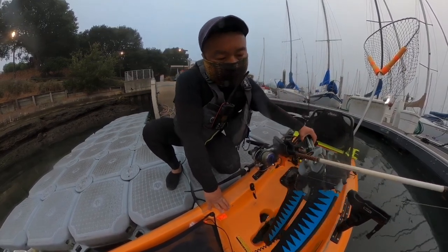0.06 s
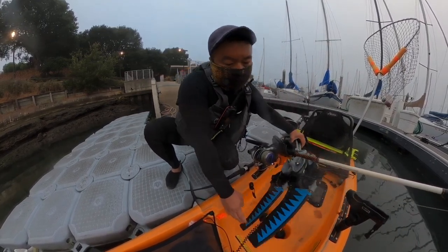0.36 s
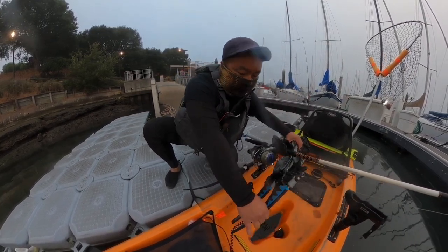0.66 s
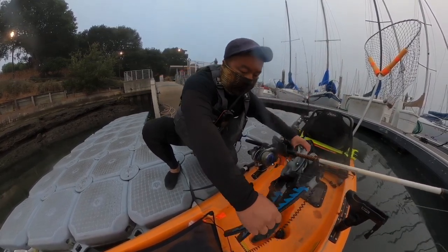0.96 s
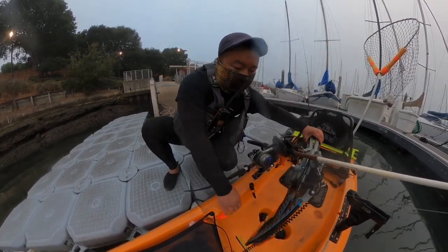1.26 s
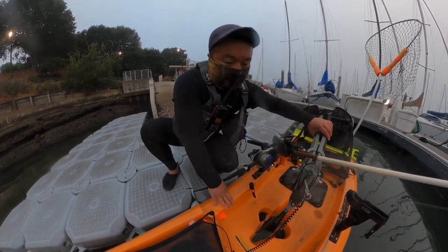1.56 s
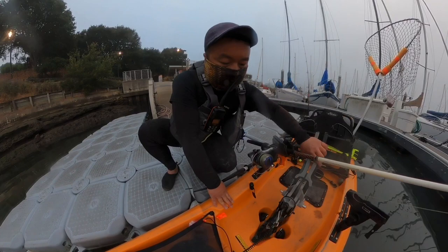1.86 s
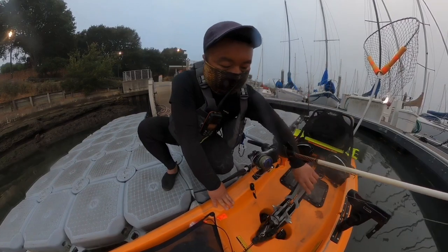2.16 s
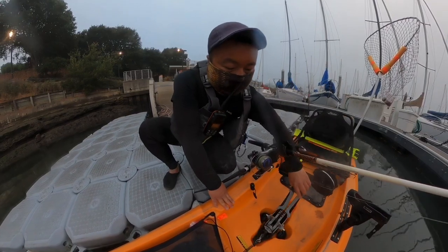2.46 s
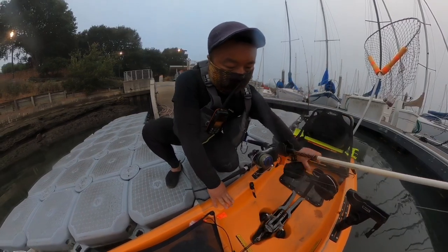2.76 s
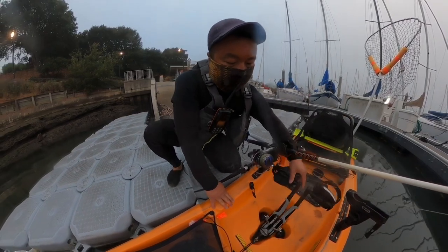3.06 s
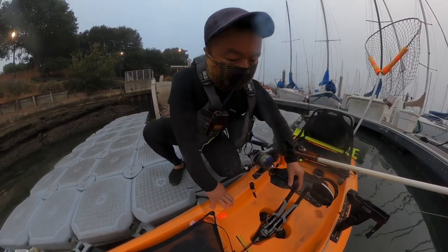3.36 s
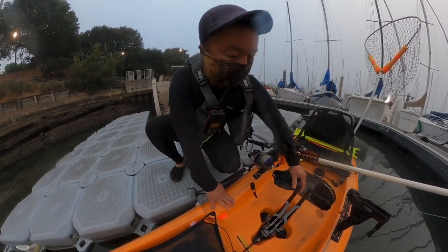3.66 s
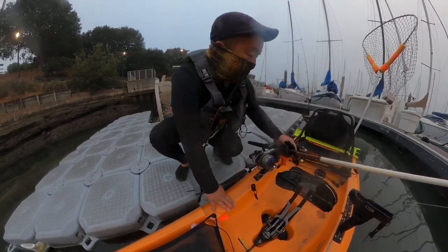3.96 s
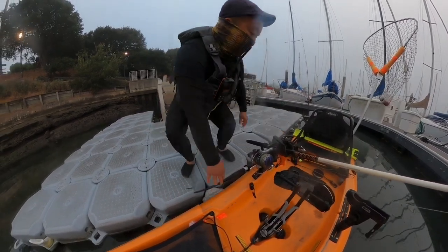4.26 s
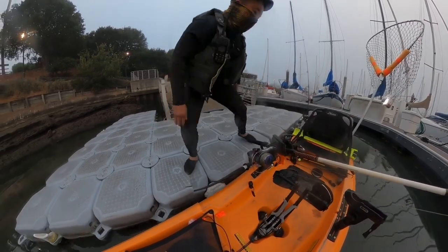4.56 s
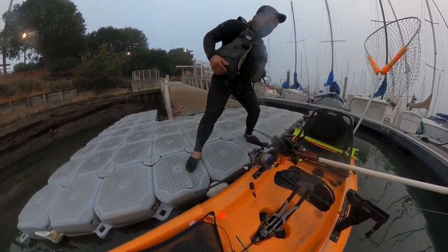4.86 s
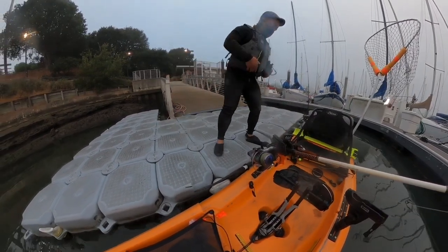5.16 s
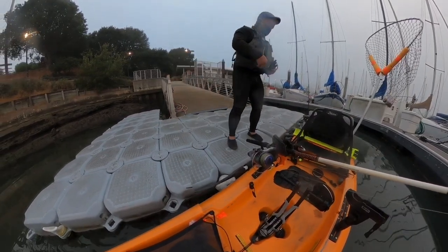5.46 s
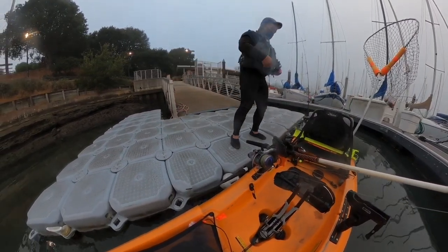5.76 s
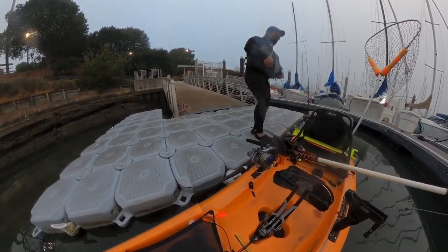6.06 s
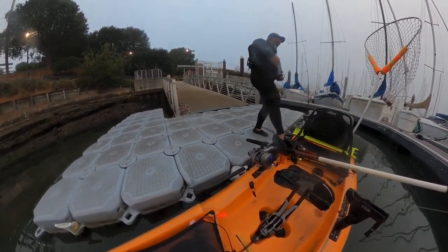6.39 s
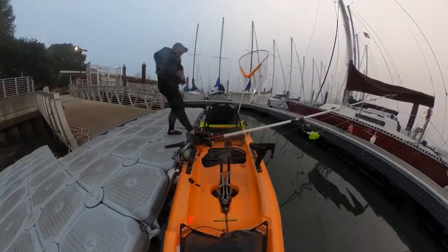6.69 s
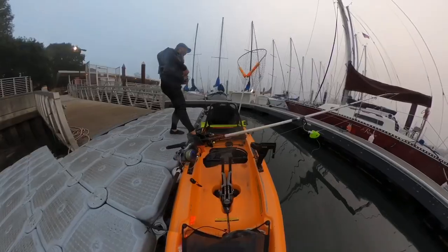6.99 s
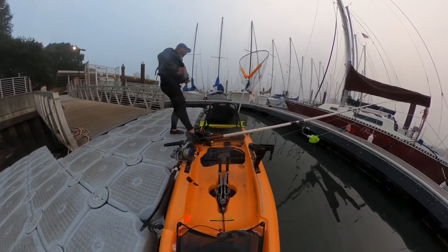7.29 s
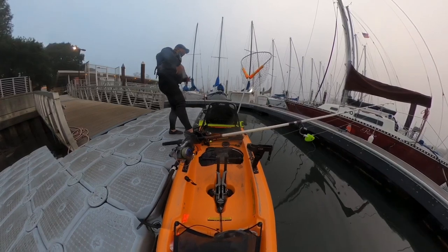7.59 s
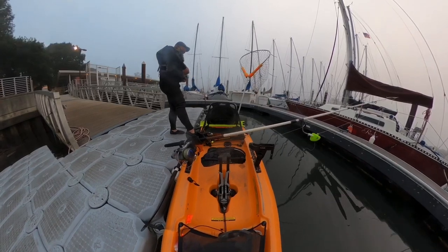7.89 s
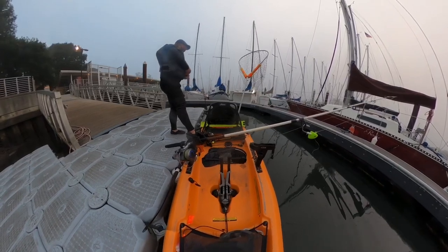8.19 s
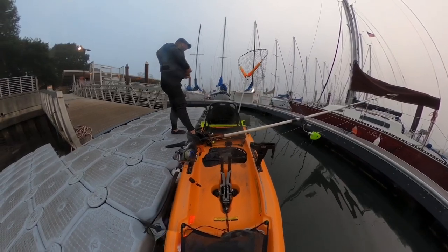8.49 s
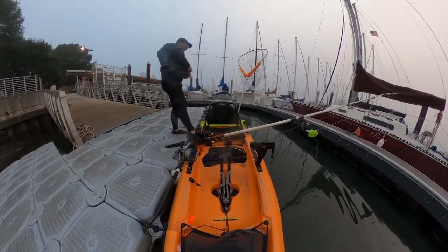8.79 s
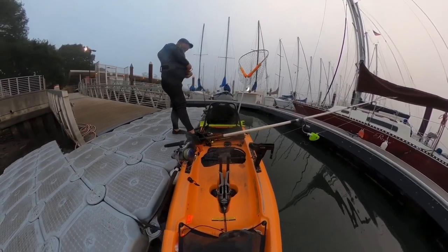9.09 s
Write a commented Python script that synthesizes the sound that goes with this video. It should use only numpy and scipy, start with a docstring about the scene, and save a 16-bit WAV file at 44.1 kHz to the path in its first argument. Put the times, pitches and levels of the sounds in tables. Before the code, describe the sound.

Faint water and rubbing open a close, dry outdoor scene beside a floating dock. After a soft bump at 0.5 seconds, a kayak's pedal drive clinks brightly from 0.8 to 1.4 seconds, mixed with plastic clacks, high catch ticks and hollow hull thumps. The mount creaks in short, fading bursts from 1.6 to 2 seconds. Clusters of hull thumps and rattling fittings follow between 2.1 and 3.1 seconds, then a firm double knock with a brief scrape near 3.5 seconds. Water sloshes lightly after the blows. After a lull, softer footsteps boom and scuff on hollow plastic floats from 4.4 to 6.5 seconds, with a few knocks. The rest is quiet, with one light knock near 7.1 seconds and faint low steps around 7.6 and 8.2. Gentle lapping, small plops, low hull rumble and faint clothing rustle continue until about 9 seconds.

```python
"""A quiet marina, beside a floating dock. A pedal drive is folded and seated in a hollow plastic kayak:
metal parts clink, a catch ticks, the mount creaks by stick-slip, fittings clack and the hull thumps,
each through its own decaying modes. The paddler then stands and steps over the booming, air-filled
floats. Soles, straps and clothes rub as grainy noise; water laps and rings with trapped bubbles."""
import sys
import numpy as np
from scipy import signal
from scipy.fft import rfft, irfft, next_fast_len
from scipy.io import wavfile
from scipy.ndimage import uniform_filter1d

SR = 44100
rng = np.random.default_rng(int(sys.argv[2]) if len(sys.argv) > 2 else 0)


def wav_out(sig):
    """Save sig, one row per channel (or a flat mono array), as 16-bit PCM at SR to the path in sys.argv[1]."""
    wavfile.write(sys.argv[1], SR, np.round(np.clip(np.atleast_2d(sig).T, -1, 1) * 32767).astype(np.int16))


N = 403074
HIT_TIME_S = np.arange(int(0.65 * SR)) / SR
TAP_TIME_S = np.arange(int(0.15 * SR)) / SR

# boat rocking: time_s, wash_db, rumble_db
ROCKING_CURVE = [(0.0, -61.5, -54.5), (0.33, -63.5, -52), (0.79, -65.5, -44.5), (0.99, -48, -43.5),
                 (1.2, -54, -43), (1.6, -48.5, -46.5), (2.09, -59, -52), (2.44, -43, -42),
                 (2.75, -57.5, -48), (3.36, -63.5, -52), (3.51, -40.5, -31), (3.84, -69.5, -59.5),
                 (4.35, -70, -63.5), (4.63, -58, -52.5), (5.01, -48.5, -45), (5.45, -65, -57),
                 (7.28, -59, -56), (8.4, -64, -51), (8.68, -69.5, -58), (9.14, -69.5, -57.5)]
# soles and straps rubbing: time_s, level_db
RUB_CURVE = [(0.0, -64), (0.89, -59.5), (1.02, -52), (1.3, -59), (1.78, -60), (2.09, -65.5), (2.31, -71.5),
             (2.47, -51), (2.67, -75), (3.56, -71), (3.69, -77), (4.63, -69), (5.01, -52.5), (5.65, -69.5),
             (7.54, -71), (7.86, -64.5), (8.15, -68.5), (9.14, -73.5)]
# clothes rustling: time_s, level_db
CLOTH_CURVE = [(0.0, -68), (0.38, -65), (0.84, -73.5), (1.02, -70), (1.52, -64), (1.81, -75.5), (2.49, -84),
               (2.67, -91), (3.21, -84.5), (3.89, -87), (4.35, -74), (4.86, -83.5), (5.11, -73), (5.7, -79),
               (7.03, -78), (7.89, -73.5), (8.09, -80.5), (9.14, -80)]
# hull rumble spectrum: freq_hz, density_db
RUMBLE_SPECTRUM = [(20, -15), (32, 4), (52, 4), (80, -1), (110, -4.5), (180, -5), (260, -15), (450, -35)]
# water wash spectrum: freq_hz, density_db
WASH_SPECTRUM = [(150, -28), (270, 5), (400, -2), (600, -11.5), (950, -16.5), (1600, -24)]
# sole and strap spectrum: freq_hz, density_db
RUB_SPECTRUM = [(650, -3.5), (900, -1), (1100, 5.5), (1400, 3.5), (2000, 0.5), (2700, -2.5), (3800, -5.5),
                (6000, -16)]
# cloth spectrum: freq_hz, density_db
CLOTH_SPECTRUM = [(2500, -6), (3600, -9), (4500, -8), (5600, -3), (7000, -5.5), (8400, -7), (9500, -16),
                  (11500, -24.5), (15000, -35)]
# sliding friction spectrum: freq_hz, density_db
SLIDE_SPECTRUM = [(200, -13), (480, 16.5), (600, 6), (870, 4), (1200, 2), (2200, -2), (3000, -3.5),
                  (4000, -8), (5300, -8), (8000, -14), (11000, -26.5), (15000, -31)]

# plops between hull and floats: start_s, level_db, pitch_hz
WATER_PLOPS = [(2.243, -47, 900), (2.639, -40, 870), (4.398, -49, 1100), (4.566, -48, 666),
               (4.75, -41, 797), (4.784, -43, 680), (5.299, -43, 1370), (5.397, -38.5, 1136),
               (5.415, -41, 1090), (5.883, -42, 753), (5.973, -39.5, 1330), (6.312, -47.5, 767),
               (6.378, -49.5, 1320), (7.185, -43.5, 1005), (7.696, -46.5, 1710), (8.08, -44.5, 790),
               (8.43, -40, 1060), (8.665, -50.5, 2000), (8.999, -46.5, 1710)]
# steps on the floats: start_s, level_db, pitch_hz, t60_s
DOCK_STEPS = [(4.458, -37, 53.7, 0.71), (4.612, -30, 61, 0.084), (5.905, -36.5, 61.1, 0.94),
              (6.438, -43, 44, 0.79), (7.593, -39, 44.4, 0.15), (8.233, -46, 56.1, 0.46)]
# short slides of gear and soles: peak_s, level_db, fall_s, centre_hz
SLIDES = [(0.12, -64, 0.22, 14100), (0.47, -59, 0.25, 2660), (1.15, -46.5, 0.056, 1900),
          (2.312, -48.5, 0.02, 2820), (2.409, -48, 0.061, 2000), (2.551, -46, 0.015, 1500),
          (3.044, -49.5, 0.012, 3500), (3.078, -44.5, 0.014, 2500), (3.428, -26, 0.013, 1440),
          (3.491, -32, 0.011, 2360), (4.585, -52.5, 0.018, 796), (4.858, -50, 0.055, 594),
          (4.94, -44, 0.086, 596), (4.96, -53, 0.041, 3000), (5.099, -53.5, 0.071, 3500),
          (5.309, -54.5, 0.054, 1850), (5.41, -49, 0.023, 1720), (5.649, -61, 0.06, 2520),
          (5.907, -59, 0.008, 6000), (6.2, -57, 0.013, 4500), (6.421, -58, 0.017, 2200),
          (6.838, -62.5, 0.016, 11230), (7.18, -59.5, 0.15, 980), (7.33, -63, 0.036, 1390),
          (7.67, -61, 0.09, 3370), (7.92, -57, 0.092, 5000), (8.799, -60.5, 0.028, 6600),
          (9.005, -53.5, 0.022, 1200)]
# hard plastic knocks: start_s, level_db, centre_hz, edge_re_level_db
PLASTIC_KNOCKS = [(0.581, -43, 1220, -15), (0.645, -43, 1450, -20), (0.663, -36, 1290, -16),
                  (0.792, -19.5, 2000, -11.5), (1.067, -27, 2330, -22), (1.108, -25, 1090, -14),
                  (1.148, -32, 1860, -20), (1.167, -21, 1430, -17), (1.183, -32, 1840, -9),
                  (1.237, -35, 1010, -9), (1.37, -26, 1720, -24), (1.631, -23.5, 907, -10.5),
                  (2.101, -32.5, 1070, -1.5), (2.122, -30, 2070, -22), (2.284, -43, 864, -25),
                  (2.308, -28, 1050, -8.5), (2.349, -28.5, 888, -13), (2.419, -26, 2070, -21),
                  (2.452, -32, 1510, -25), (2.495, -42, 1880, 8), (2.545, -31, 802, -15.5),
                  (2.581, -36, 1370, -26), (2.627, -41, 853, -17.5), (2.722, -39, 1050, -25),
                  (2.818, -49.5, 961, -35), (2.87, -43.5, 1410, -7.5), (3.081, -28.5, 2100, -26),
                  (3.118, -27, 985, -26), (3.184, -48.5, 2020, -20), (3.331, -44, 1980, -7),
                  (3.421, -24.5, 850, -7), (3.486, -23, 1110, -19), (3.511, -35.5, 1070, -27),
                  (3.833, -49.5, 1070, -30), (3.865, -45, 1900, -36), (4.816, -36.5, 1100, -27),
                  (4.845, -41, 934, -33), (5.953, -37.5, 2190, -11), (6.12, -47.5, 1950, -25),
                  (7.116, -36.5, 1160, -9)]
# stick-slip runs of the mount: start_s, slip_count, gap_s
SLIP_RUNS = [(1.5778, 4, 0.0076), (1.6686, 5, 0.0058), (1.7414, 2, 0.018), (1.8108, 3, 0.017),
             (1.8816, 2, 0.014), (1.9659, 2, 0.031)]
# catch contacts: start_s, level_db, centre_hz
CATCH_HITS = [(0.9243, -47, 4850), (1.1955, -25, 4680), (1.2736, -37, 5450), (1.28, -23.5, 5390),
              (1.3588, -24, 5240), (1.4371, -34, 4960)]
# metal contacts in the drive: start_s, level_db, centre_hz
METAL_HITS = [(0.7846, -24, 4630), (0.792, -22, 2500), (0.8057, -10.5, 2560), (0.8268, -13.5, 2540),
              (0.8325, -14.5, 2570), (0.8881, -19, 2680), (0.9734, -9, 2700), (1.014, -27, 4200),
              (1.041, -33, 3360), (1.066, -20.5, 2320), (1.366, -21.5, 2340)]
# blows on the hull: start_s, level_db, pitch_hz, boom_re_level_db, rap_re_level_db, rap_hz
HULL_BLOWS = [(0.523, -35, 92, 5.5, -26, 500), (0.774, -26, 100, -1, -17, 990),
              (0.796, -23, 285, -6, -6.5, 810), (0.827, -24.5, 135, 1, -9, 1030),
              (0.978, -27, 248, -18, -19, 1020), (1.126, -16.5, 266, -12, -29, 456),
              (1.166, -33, 135, -3, -15, 1030), (1.351, -26.5, 145, -3, -28, 480),
              (1.586, -19.5, 153, -25, -14, 530), (1.674, -27.5, 160, -2.5, -9.5, 494),
              (1.757, -28.5, 151, -11, -18, 595), (2.097, -16.5, 135, -8, -9, 504),
              (2.31, -15.5, 114, -30, -23, 540), (2.411, -20.5, 123, 3, -10, 800),
              (2.45, -27, 110, -1, -19, 870), (2.52, -19.5, 116, -18, -26, 496),
              (2.543, -25, 200, -21, -5.5, 660), (2.75, -29.5, 123, -18, -16, 705),
              (2.94, -31.5, 151, -27, -16, 750), (3.031, -23.5, 112, -6, -8.5, 490),
              (3.07, -23, 220, -2, -14, 510), (3.324, -32, 296, -7.5, -22, 455),
              (3.374, -30.5, 219, -3, -9, 440), (3.42, -15, 215, -6, -4, 765),
              (3.488, -21, 370, -4.5, -5, 690), (4.424, -37, 122, 1, -8, 487),
              (4.611, -32, 110, -6, -12, 690), (4.847, -37.5, 200, -10, 9, 615),
              (4.927, -28.5, 200, -2, -2, 463), (5.399, -45.5, 218, -15, -24, 1120),
              (5.825, -43, 231, -21, -10, 630), (5.998, -37.5, 110, -3, -15, 450),
              (6.425, -39.5, 270, -6, -15, 835), (6.814, -47.5, 200, -7, -9, 450),
              (7.119, -36, 170, -16, 0.5, 493), (7.186, -43.5, 225, -12, -14, 1010)]

# plastic fitting modes: freq_hz, level_db, t60_s
FITTING_MODES = [(919, -6.5, 0.05), (1043, -3.5, 0.047), (1121, -2.5, 0.048), (1280, -1.5, 0.032),
                 (1480, -10.5, 0.036), (1658, -8, 0.033), (1856, 0, 0.039), (1980, -18, 0.043),
                 (2062, 6, 0.024), (2316, 4, 0.013), (2923, -7, 0.028)]
# mount modes: freq_hz, level_db, t60_s
MOUNT_MODES = [(1446, 12.5, 0.015), (1707, 8, 0.032), (1880, -5, 0.022), (2140, 11.5, 0.0066),
               (3140, -11, 0.022), (3450, -3, 0.017), (5100, -14, 0.017), (5750, -17, .02)]
# catch modes: freq_hz, level_db, t60_s
CATCH_MODES = [(4100, -2.5, 0.011), (4890, 2.5, 0.015), (5290, 1.5, 0.022), (6430, -4, 0.015),
               (6840, -18, 0.023), (8440, -10, 0.028)]
# drive metal modes: freq_hz, level_db, t60_s
METAL_MODES = [(2220, -8.5, 0.069), (2380, -16, .035), (2445, -1, 0.055), (2450, -1, 0.032),
               (2566, 3.5, 0.044), (2720, -6, 0.04), (2930, 2, 0.026), (3420, -16, 0.033),
               (3490, -17, 0.029), (3690, -8, 0.02), (3695, -1.5, 0.035), (4050, 1, 0.015),
               (5020, -8, 0.024), (4910, 1.5, 0.031), (5680, -10.5, 0.073), (6200, -7, 0.046),
               (6560, -6.5, 0.018), (8500, -28.5, .03)]
# hull shell modes: freq_hz, level_db, t60_s
HULL_MODES = [(35.6, -6, 0.36), (63.7, -1.5, 0.18), (73.2, -4.5, 0.73), (108.6, 2.5, 0.5),
              (133.6, -3, 0.44), (150.2, -6.5, 0.98), (184.9, -8.5, 0.69), (204.4, -1, 0.54),
              (233.1, 4, .3), (262, 0.5, 0.37), (286.2, -6, 0.69), (312.4, -2.5, 0.26), (357, -5, 0.28),
              (410, -10, 0.2), (452.9, -7.5, 0.11), (501.5, 2, .11), (649, 1.5, 0.085), (730, -3, 0.13),
              (798, -5.5, 0.11), (854, 0.5, 0.14), (1009, 3.5, 0.093)]
# limits of the hull's boom, body, knock and rap bands: edge_hz
HULL_BAND_EDGES_HZ = [20, 90, 190, 450, 1200]


def from_db(db):
    """Decibels to gain."""
    return 10 ** (np.asarray(db) / 20)


def unit_rms(x):
    """Scale to rms 1."""
    return x / np.sqrt(np.mean(x ** 2) + 1e-20)


def unit_crest(x, window_samples=176):
    """Scale the loudest window to rms 1."""
    power = uniform_filter1d(x ** 2, window_samples, mode="constant")
    return x / np.sqrt(power.max() + 1e-20)


def fade(t, t60_s):
    """Exponential decay, 60 dB in t60_s."""
    return np.exp(-np.log(1000) * t / max(t60_s, 1e-3))


def press(t, rise_s):
    """Contact force build-up."""
    return 1 - np.exp(-t / rise_s)


def add(out, start_s, x):
    """Mix x into out at start_s."""
    i = max(round(start_s * SR), 0)
    out[i:i + len(x)] += x[:max(N - i, 0)]


def per_sample(curve):
    """Columns of a control curve at every sample."""
    time_s, *columns = np.transpose(curve)
    return [np.interp(np.arange(N) / SR, time_s, column) for column in columns]


def band(x, low_hz, high_hz):
    """Causal band-pass."""
    return signal.sosfilt(signal.butter(2, [low_hz, high_hz], "band", fs=SR, output="sos"), x)


def burst(t, t60_s, low_hz, high_hz):
    """Decaying band noise."""
    return band(rng.standard_normal(len(t)) * fade(t, t60_s), low_hz, high_hz)


def coloured(x, spectrum):
    """Shape x to a spectrum, 24 dB/octave down beyond its ends; rms 1."""
    size = next_fast_len(len(x))
    hz, db = np.transpose(spectrum)
    log_hz = np.log(np.arange(size // 2 + 1) * SR / size + 1)
    outside = np.maximum(np.log(hz[0]) - log_hz, 0) + np.maximum(log_hz - np.log(hz[-1]), 0)
    gain = from_db(np.interp(log_hz, np.log(hz), db)) * np.exp(-4 * outside)
    return unit_rms(irfft(rfft(x, size) * gain, size)[:len(x)])


def grains(samples, per_s, spread_db):
    """Noise of tiny uneven contacts; power independent of spread."""
    index = np.arange(samples)
    strength = np.interp(index * per_s / SR, index, rng.standard_normal(samples))
    expected_rms = np.exp(np.log(from_db(spread_db)) ** 2 * 2 / 3)
    return rng.standard_normal(samples) * from_db(spread_db * strength) / expected_rms


def mode_shapes(modes, t):
    """Mode frequencies and one decaying sine per mode."""
    shapes = [from_db(db) * np.sin(2 * np.pi * hz * t) * fade(t, t60_s) for hz, db, t60_s in modes]
    return np.array(modes)[:, 0], np.array(shapes)


def favour(hz, centre_hz, focus_db):
    """Drive from a contact: 1 at its centre, focus_db less an octave away."""
    return from_db(-focus_db * np.log2(hz / centre_hz) ** 2)


def strike(weights, spread_db=3.0):
    """Random strength and sign per mode."""
    strength = from_db(spread_db * rng.standard_normal(len(weights)))
    return weights * strength * rng.choice([-1, 1], len(weights))


def taps(hits, modes, gain_db, focus_db, crack_db, crack_t60_s, crack_band_hz, contact_s, detune):
    """Small hard contacts: a brief crack plus the part's modes."""
    out, t = np.zeros(N), TAP_TIME_S
    mode_hz, shapes = mode_shapes(modes, t)
    for start_s, level_db, centre_hz in hits:
        ring = unit_crest(strike(favour(mode_hz, centre_hz, focus_db)) @ shapes)
        # each tap rings at a slightly different, random pitch
        ring = np.interp(t * (1 + detune * rng.standard_normal()), t, ring)
        crack = from_db(crack_db) * unit_crest(burst(t, crack_t60_s, *crack_band_hz))
        tap = unit_crest((ring + crack) * press(t, contact_s))
        add(out, start_s, from_db(level_db + gain_db) * tap)
    return out


def bubble(hz, t60_cycles, rise_per_s):
    """A trapped bubble rings and rises in pitch."""
    t = TAP_TIME_S
    return np.sin(2 * np.pi * hz * t * (1 + rise_per_s * t / 2)) * fade(t, t60_cycles / hz)


def bubble_stream(per_s, t60_cycles, low_hz, high_hz, spread_db, tilt_db_per_octave):
    """Bubbles of random time, size and strength; rms 1."""
    out = np.zeros(N)
    gaps, sizes, strengths = rng.random((700, 3)).T
    for start_s, size, strength in zip(np.cumsum(-np.log(gaps)) / per_s, sizes, strengths):
        hz = low_hz * (high_hz / low_hz) ** size
        level_db = tilt_db_per_octave * np.log2(hz / low_hz) - spread_db * np.log(max(strength, 0.05))
        ring = bubble(hz, t60_cycles, rise_per_s=0.89) * press(TAP_TIME_S, 1 / hz)
        add(out, start_s, from_db(level_db) * ring)
    return unit_rms(out)


def with_marina_scatter(x, wet_db=-27.0, t60_s=0.26, delay_s=0.004):
    """Add faint dull scatter from floats, bank and moored boats."""
    t = HIT_TIME_S
    scatter = band(rng.standard_normal(len(t)), 81, 4600) * fade(t, t60_s) * (t > delay_s)
    return x + from_db(wet_db) * signal.fftconvolve(x, scatter / np.linalg.norm(scatter))[:N]


def fizz(level_db=-86.0):
    """The smallest bubbles burst with faint ticks."""
    return from_db(level_db) * bubble_stream(per_s=20.0, t60_cycles=39.0, low_hz=1800, high_hz=8600,
                                             spread_db=4.0, tilt_db_per_octave=-1.5)


def clothes_rustle(gain_db=1.5):
    """Cloth rubs in fine grains."""
    level_db, = per_sample(CLOTH_CURVE)
    return from_db(level_db + gain_db) * coloured(grains(N, per_s=230, spread_db=2.6), CLOTH_SPECTRUM)


def sole_and_strap_rub(gain_db=-1.5):
    """Harder rubbing catches more and turns gritty."""
    level_db, = per_sample(RUB_CURVE)
    grit_db = np.interp(level_db, [-62, -48], [2.0, 4.5])
    return from_db(level_db + gain_db) * coloured(grains(N, per_s=330, spread_db=grit_db), RUB_SPECTRUM)


def hull_rumble(gain_db=2.5):
    """The rocking hull rumbles on the water."""
    _, rumble_db = per_sample(ROCKING_CURVE)
    return from_db(rumble_db + gain_db) * coloured(grains(N, per_s=20, spread_db=4.5), RUMBLE_SPECTRUM)


def slosh_envelope(gain_db=-18, rise_s=0.05, t60_s=0.24):
    """Water swells and settles after each hull blow."""
    power = np.zeros(N)
    swell = press(HIT_TIME_S, rise_s) * fade(HIT_TIME_S, t60_s)
    for start_s, level_db, *_ in HULL_BLOWS:
        add(power, start_s, (from_db(level_db + gain_db) * swell) ** 2)
    return np.sqrt(power)


def lapping_water(lap_db=4.0, foam_db=-7.5, gurgle_db=-9.5):
    """Foam and gurgles, driven by rocking and slosh."""
    wash_db, _ = per_sample(ROCKING_CURVE)
    envelope = np.hypot(from_db(wash_db + lap_db), slosh_envelope())
    foam = coloured(grains(N, per_s=95, spread_db=5.5), WASH_SPECTRUM)
    gurgle = bubble_stream(per_s=45.0, t60_cycles=33.0, low_hz=230, high_hz=1300,
                           spread_db=4.5, tilt_db_per_octave=-3.0)
    return envelope * (from_db(foam_db) * foam + from_db(gurgle_db) * gurgle)


def drips(count=40, per_s=3.3, level_db=-55, centre_hz=1474, spread_octaves=0.6):
    """Faint random plops, as WATER_PLOPS rows."""
    starts_s = np.cumsum(rng.exponential(1 / per_s, count))
    octaves = spread_octaves * np.clip(rng.standard_normal(count), -2, 2)
    return [(start_s, level_db, centre_hz * 2 ** octave) for start_s, octave in zip(starts_s, octaves)]


def water_plops(gain_db=-8.5, splash_db=-2.0, splash_t60_s=0.068):
    """Each plop: one bubble inside a small splash."""
    out = np.zeros(N)
    for start_s, level_db, hz in WATER_PLOPS + drips():
        ring = unit_crest(bubble(hz, t60_cycles=59.0, rise_per_s=1.3))
        splash = from_db(splash_db) * unit_crest(burst(TAP_TIME_S, splash_t60_s, hz / 1.52, hz * 1.5))
        add(out, start_s, from_db(level_db + gain_db) * unit_crest(ring + splash))
    return out


def scuffs(focus_db=1.7, rise_to_fall=0.79):
    """Gritty friction swells as a part slides home and dies as it stops."""
    out = np.zeros(N)
    t = HIT_TIME_S - TAP_TIME_S[-1]   # zero at the peak
    for peak_s, level_db, fall_s, centre_hz in SLIDES:
        spectrum = [(hz, db - focus_db * np.log2(hz / centre_hz) ** 2) for hz, db in SLIDE_SPECTRUM]
        swell = np.exp(-np.abs(t) / np.where(t < 0, rise_to_fall * fall_s, fall_s))
        grit = coloured(grains(len(t), per_s=380, spread_db=3.0), spectrum)
        add(out, peak_s + t[0], from_db(level_db) * swell * grit)
    return out


def dock_booms(gain_db=4.0, contact_s=0.0059):
    """A soft sole sets an air-filled float booming."""
    out, t = np.zeros(N), HIT_TIME_S
    for start_s, level_db, hz, t60_s in DOCK_STEPS:
        boom = np.sin(2 * np.pi * hz * t) * fade(t, t60_s) * press(t, contact_s)
        add(out, start_s, from_db(level_db + gain_db) * boom)
    return out


def rattles(gain_db=-21.5, within_s=0.1, centre_hz=1340, spread_octaves=0.19, edge_db=-16.5):
    """Loose fittings knock twice after each hull blow, as PLASTIC_KNOCKS rows."""
    knocks = []
    for blow_s, level_db, *_ in HULL_BLOWS:
        for _ in range(2):
            start_s = blow_s + within_s * rng.random()
            hz = centre_hz * 2 ** (spread_octaves * rng.standard_normal())
            knocks.append((start_s, level_db + gain_db, hz, edge_db))
    return knocks


def plastic_clacks(knock_db=-8.0, chatter_db=-5.5, snap_db=-10.0, contact_s=0.00069):
    """Plastic on plastic: fittings ring, faces chatter, a hard edge snaps."""
    out, t = np.zeros(N), TAP_TIME_S
    mode_hz, shapes = mode_shapes(FITTING_MODES, t)
    for start_s, level_db, centre_hz, edge_db in PLASTIC_KNOCKS + rattles():
        ring = unit_crest(strike(favour(mode_hz, centre_hz, focus_db=1.0)) @ shapes)
        chatter = unit_crest(burst(t, t60_s=0.064, low_hz=centre_hz / 1.63, high_hz=centre_hz * 1.18))
        snap = unit_crest(burst(t, t60_s=0.059, low_hz=2800, high_hz=4750))
        knock = unit_crest((ring + from_db(chatter_db) * chatter) * press(t, contact_s))
        clack = from_db(knock_db) * knock + from_db(edge_db + snap_db) * snap
        add(out, start_s, from_db(level_db) * clack)
    return out


def mount_creak(first_db=-20, fade_db_per_s=53.5, spread_db=2.0, centre_hz=1600):
    """Stick-slip as the drive swings down; slips weaken as the load comes off."""
    starts_s = [run_s + k * gap_s for run_s, count, gap_s in SLIP_RUNS for k in range(count)]
    slips = []
    for start_s in starts_s:
        level_db = first_db - fade_db_per_s * (start_s - starts_s[0])
        slips.append((start_s, level_db + spread_db * rng.standard_normal(), centre_hz))
    return taps(slips, MOUNT_MODES, gain_db=-10.0, focus_db=-1.5, crack_db=-17.0, crack_t60_s=0.049,
                crack_band_hz=(1200, 3720), contact_s=0.00051, detune=0.008)


def catch_ticks():
    """A small catch rings high and briefly."""
    return taps(CATCH_HITS, CATCH_MODES, gain_db=-9.0, focus_db=4.0, crack_db=-4.0, crack_t60_s=0.023,
                crack_band_hz=(3900, 6930), contact_s=0.00032, detune=0.02)


def drive_clinks(bounce_s=0.016, bounce_loss_db=14, jitter=0.23):
    """Metal parts meet and bounce twice, ever weaker."""
    hits = []
    for start_s, level_db, centre_hz in METAL_HITS:
        for k in range(3):
            delay_s = k * bounce_s * (1 + jitter * rng.uniform(-1.1, 1))
            hits.append((start_s + delay_s, level_db - k * bounce_loss_db, centre_hz))
    return taps(hits, METAL_MODES, gain_db=-15.0, focus_db=8.5, crack_db=-5.5, crack_t60_s=0.026,
                crack_band_hz=(1800, 4800), contact_s=0.00041, detune=0.022)


def hull_thumps(gain_db=-8.0, loose_db=-12.0, loose_t60_s=0.15, dent_cycles=0.6, drive_floor=0.34):
    """The hollow shell rings in four bands, weighted by where and how hard it is struck."""
    out, t = np.zeros(N), HIT_TIME_S
    mode_hz, shapes = mode_shapes(HULL_MODES, t)
    for start_s, level_db, pitch_hz, boom_db, rap_db, rap_hz in HULL_BLOWS:
        low_drive = favour(mode_hz, pitch_hz, focus_db=34.5)
        rap_drive = 2 * favour(mode_hz, rap_hz, focus_db=49.5)
        mode_gains = strike(drive_floor + low_drive + rap_drive)
        # heavier blows are held down more firmly: t60 halves per 21 dB
        damping = fade(t, t60_s=0.92 * 2 ** ((-29.5 - level_db) / 21))
        shares = [from_db(boom_db),
                  favour(128, pitch_hz, focus_db=5.0),   # body
                  favour(280, pitch_hz, focus_db=5.0),   # knock
                  from_db(rap_db - 4.0)]
        for low_hz, high_hz, share in zip(HULL_BAND_EDGES_HZ, HULL_BAND_EDGES_HZ[1:], shares):
            in_band = (mode_hz >= low_hz) & (mode_hz < high_hz)
            ring = unit_rms((mode_gains * in_band) @ shapes)
            loose_gear = from_db(loose_db) * unit_rms(burst(t, loose_t60_s, low_hz, high_hz))
            dent = press(t, dent_cycles / high_hz)   # the wall dents slowly: low bands build later
            thump = unit_crest(damping * dent * (ring + loose_gear), window_samples=1300)
            add(out, start_s, from_db(level_db + gain_db) * share * thump)
    return out


def scene(drive_top_hz=8500):
    """Contacts in open air over a bed of water and rubbing; mono."""
    # low-pass softens the top treble of the clinks, ticks and creak
    low_pass = signal.butter(4, drive_top_hz, fs=SR, output="sos")
    drive = signal.sosfilt(low_pass, drive_clinks() + catch_ticks() + mount_creak())
    contacts = hull_thumps() + drive + plastic_clacks() + scuffs() + dock_booms() + water_plops()
    bed = hull_rumble() + lapping_water() + sole_and_strap_rub() + clothes_rustle() + fizz()
    return (with_marina_scatter(contacts) + bed)[None]


def record(dry):
    """High-pass at 20 Hz; stopband from 16.2 kHz."""
    dry = signal.sosfilt(signal.butter(2, 20, "high", fs=SR, output="sos"), dry)
    return signal.sosfilt(signal.cheby2(12, 70, 16200, fs=SR, output="sos"), dry)


dry = scene()
out = record(dry)
wav_out(out)
```